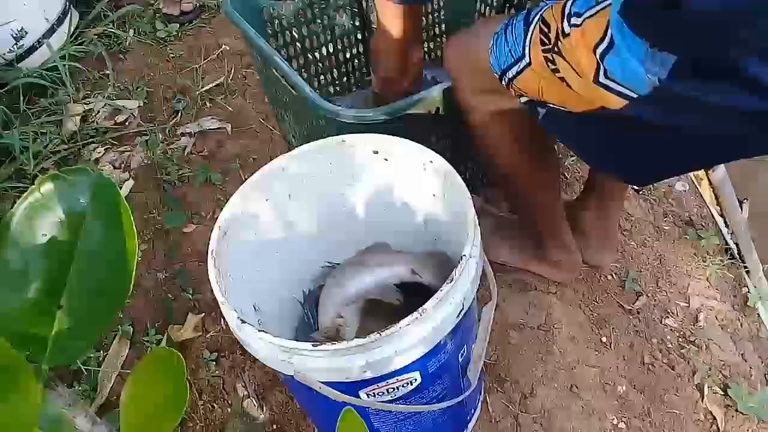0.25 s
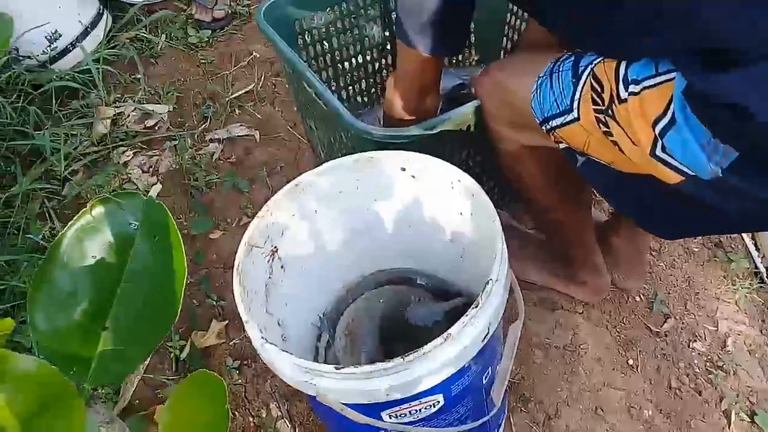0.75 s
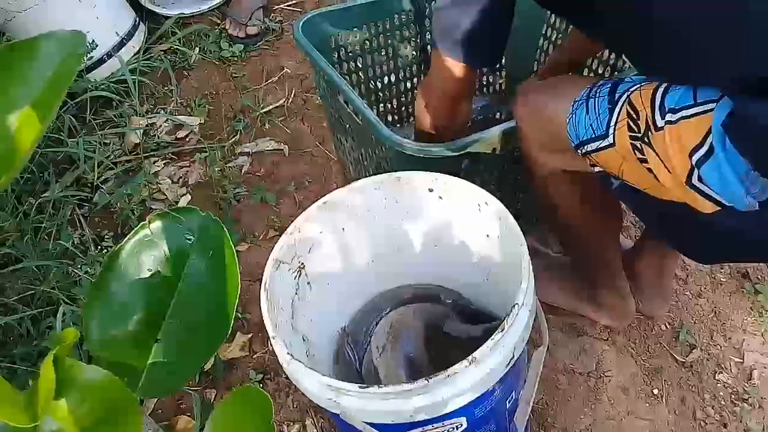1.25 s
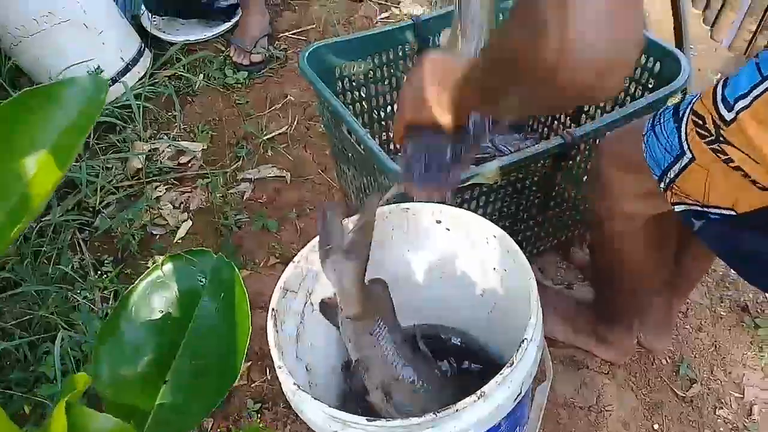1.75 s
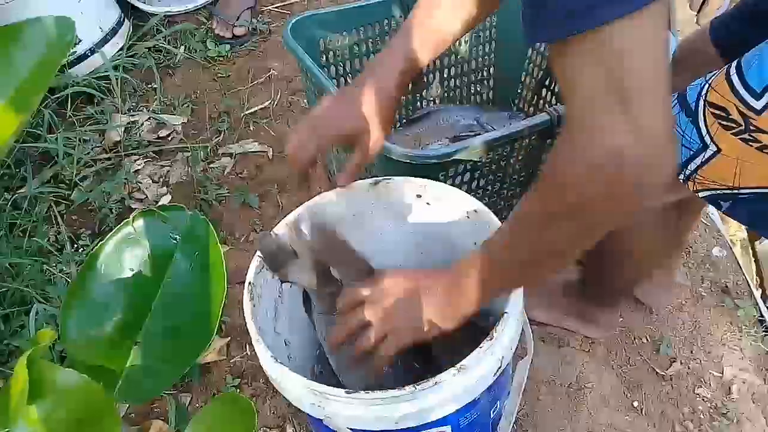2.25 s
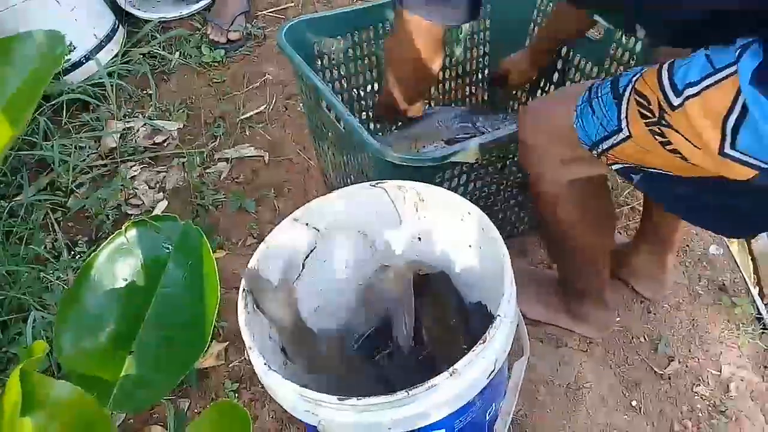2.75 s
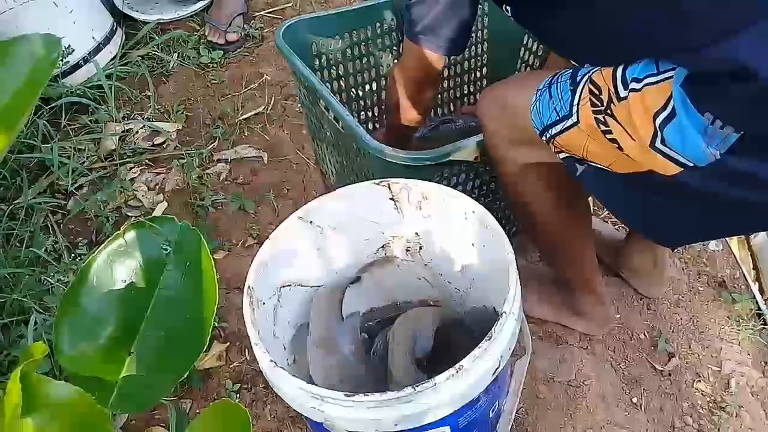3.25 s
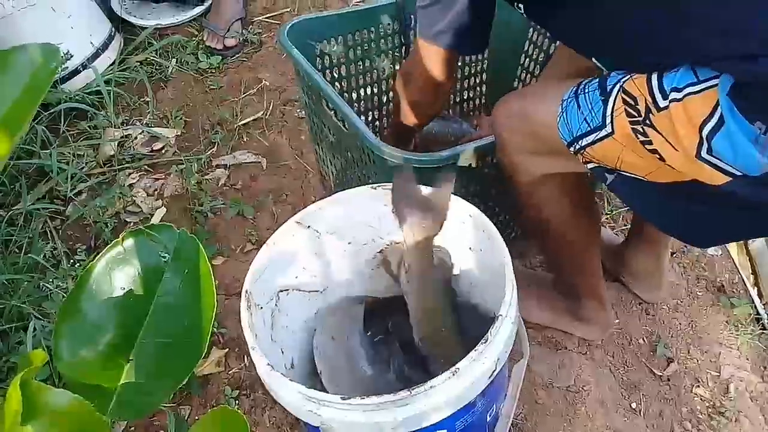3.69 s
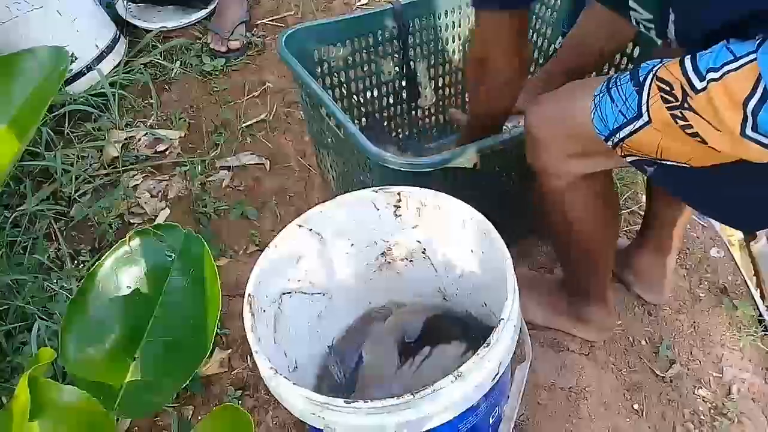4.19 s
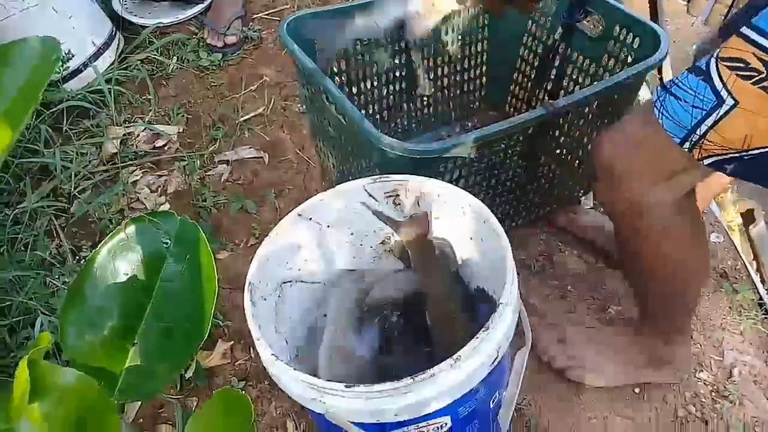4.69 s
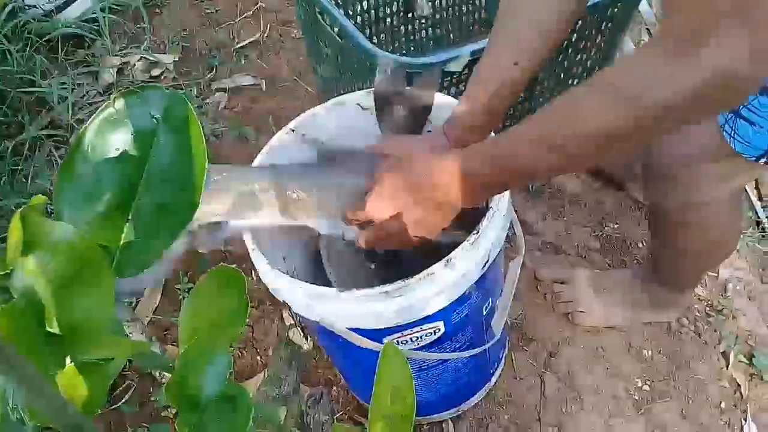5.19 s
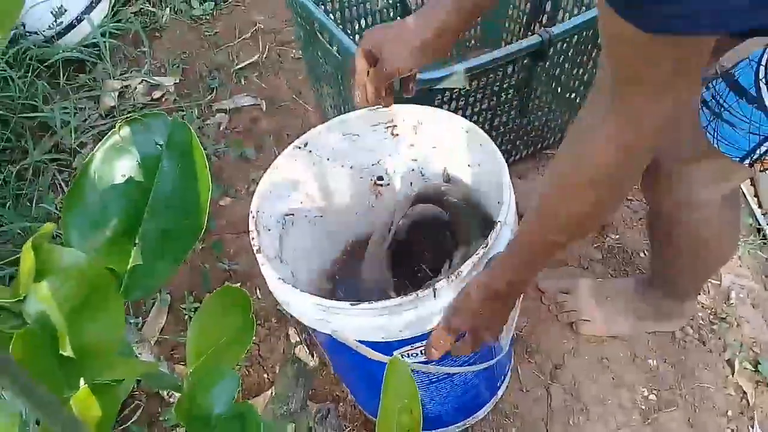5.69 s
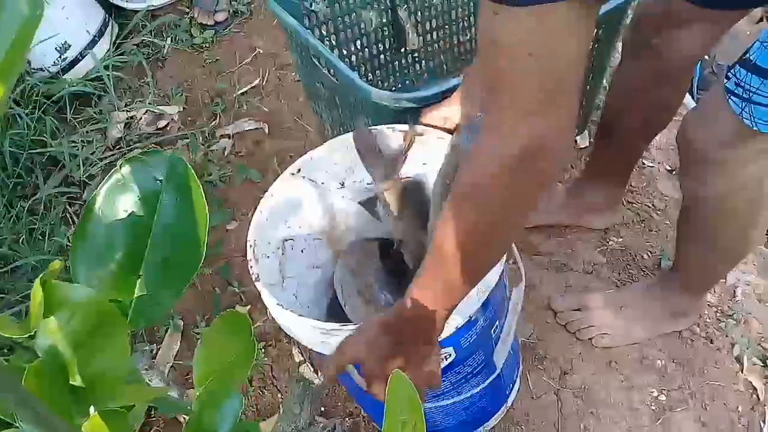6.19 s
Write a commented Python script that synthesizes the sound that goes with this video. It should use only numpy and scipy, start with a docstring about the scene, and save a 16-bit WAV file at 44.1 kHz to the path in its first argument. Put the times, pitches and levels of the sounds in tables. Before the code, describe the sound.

Wet slaps, slimy squelches and dull hollow knocks of fish flopping in a plastic pail, with popping bubbles, dripping spray and very soft far insects.

```python
"""A soft garden hush with far insects is heard first, under the squelch of live fish in a plastic bucket.
The fish wriggle over one another, sounding by friction and by many small bubbles; larger air pockets pop.
In fits they thrash: wet tails slap with impulsive noise bursts, and thrown spray patters back.
Heavy bodies make the bucket's air column resonate, and fish dropped in land on the bottom with dull thuds.
"""
import sys
import numpy as np
from scipy import signal
from scipy.fft import rfft, irfft
from scipy.io import wavfile

SR = 44100
rng = np.random.default_rng(int(sys.argv[2]) if len(sys.argv) > 2 else 0)


def master(y):
    """Save y as 16-bit WAV."""
    cut = np.clip(np.atleast_2d(y).T, -1, 1)
    pcm = np.round(cut * 32767)  # scale
    wavfile.write(sys.argv[1], SR, pcm.astype(np.int16))


N = 283739

# Spectrum of the garden hush, before scaling to unit rms: f/Hz, relative level/dB
HUSH_SPECTRUM = [(18, -45), (30, -11.5), (97, 2.5), (197, -8), (332, -3.5), (546, -16), (2420, 1.5),
                 (6540, -11.5), (7650, -11.5), (8280, -17), (10200, -10.5), (13600, -33.5), (15500, -32)]
# Resonant notes of far insects: f/Hz, half-amplitude width/Hz, level before the swell/dB
INSECT_NOTES = [(3380, 25, -62), (7570, 530, -59.5), (13561, 100, -68.5)]
# Swell of the insect chorus: t/s, relative level/dB
CHORUS_SWELL = [(0, 0), (1.8, 0), (4.9, 2.5), (6.2, -5.5)]
# Fish wriggling over others: t of greatest motion/s, half length/s, squelch level/dB, wall-rub level/dB
WRIGGLES = [(0.197, 0.037, -45, -53.5), (0.356, 0.096, -48, -56), (0.557, 0.023, -45, -41),
            (0.806, 0.065, -43, -50), (0.992, 0.032, -45.5, -63), (1.234, 0.056, -42, -44.5),
            (1.61, 0.051, -52.5, -59), (2.235, 0.025, -48, -49.5), (2.477, 0.091, -51, -47),
            (3.107, 0.017, -36, -46), (3.43, 0.17, -53, -56.5), (4.294, 0.15, -51, -54.5),
            (4.75, 0.075, -44, -66), (4.96, 0.13, -54, -54.5), (5.308, 0.063, -39.5, -37),
            (5.5, 0.15, -42, -41), (6, 0.091, -51, -52), (6.245, 0.093, -43.5, -43),
            (6.428, 0.065, -47, -51.5)]
# Spectral weight of squelching bubbles: f/Hz, relative level/dB
SQUELCH_SPECTRUM = [(400, -8), (1400, 2.5), (4500, -3.5), (6500, -15.5), (10500, -12), (15500, -26)]
# Popping air pockets: t/s, level/dB, f/Hz
AIR_POCKETS = [(0.26, -28.5, 1620), (0.384, -30, 1860), (0.399, -26, 1050), (1.666, -29, 2320),
               (2.734, -28, 1154), (3.127, -14, 4800), (3.27, -26, 1204), (3.503, -32, 1430),
               (3.813, -15, 915), (5.241, -20, 853), (5.29, -22, 893), (5.397, -36, 720),
               (5.414, -28, 1760), (5.674, -25, 1760)]
# Modes of the bucket's cavity and wall: f/Hz, level relative to the ring setting/dB, 60 dB decay time/s
BUCKET_MODES = [(840, -18, 0.018), (1010, -23, 0.019), (1020, -25, 0.018), (1350, -11, 0.058),
                (1427, 4, 0.036), (1516, -0.5, 0.075), (1860, -4.5, 0.12), (4370, 1, 0.03)]
# Spectrum of wet impacts: f/Hz, relative level/dB
WET_SPECTRUM = [(200, 3), (450, -1.5), (900, 0), (2800, 5.5), (4600, 4), (6200, 1.5), (10500, 1.5),
                (13000, -3.5), (15500, -15)]
# Slaps of a tail or flank: t/s, smack level/dB, f of the hollow under it/Hz,
# body level/dB, spray level/dB, decay time/s
SLAPS = [(0.5069, -23, 1540, -19, -27, 0.0024), (0.5715, -34.5, 2480, -46, -45, 0.0034),
         (0.723, -42.5, 4500, -46, -46, 0.0044), (0.778, -37.5, 1650, -43, -38, 0.013),
         (1.0287, -39.5, 4760, -42, -46, 0.0059), (1.2222, -30, 4640, -64, -36.5, 0.008),
         (1.276, -37.5, 1370, -53, -38.5, 0.0052), (1.3368, -34, 2700, -36.5, -41, 0.0051),
         (2.382, -33.5, 1440, -44, -35, 0.0044), (2.7203, -37.5, 1510, -28, -50, 0.012),
         (3.0193, -24.5, 2750, -24, -23, 0.0086), (3.0451, -29.5, 4230, -38, -28.5, 0.017),
         (3.0589, -29.5, 2110, -27, -36, 0.0036), (3.1254, -35, 4740, -38, -39, 0.0059),
         (3.169, -40.5, 4150, -54, -42, 0.0032), (3.768, -23, 1735, -21.5, -25, 0.017),
         (3.819, -21, 1560, -19.5, -22, 0.0083), (3.853, -32.5, 2660, -45, -30, 0.0076),
         (4.4988, -29, 4350, -31, -25, 0.0027), (4.5128, -27, 1460, -24, -40, 0.0041),
         (4.5263, -20.5, 1440, -42, -24.5, 0.016), (4.563, -26.5, 4080, -23.5, -33.5, 0.0025),
         (4.6028, -34.5, 2270, -53, -45, .005), (4.6505, -35.5, 2930, -35.5, -45, 0.011),
         (4.733, -32.5, 1990, -42, -38, 0.0056), (5.241, -33.5, 1650, -24, -42, 0.011),
         (5.2544, -26.5, 2080, -30, -22.5, 0.0094), (5.2887, -27.5, 1550, -27, -38, 0.021),
         (5.337, -29.5, 2000, -29.5, -37.5, 0.021), (5.4212, -33, 1740, -33, -36, 0.0059),
         (5.7269, -27, 2070, -21.5, -33, 0.0052), (6.197, -23.5, 3980, -21.5, -22.5, 0.0097),
         (6.2254, -28.5, 1510, -29, -31, 0.005)]
# Whole fish landing on the bottom: t one thud time after the height/s, level/dB
LANDINGS = [(0.519, -19), (3.059, -31), (3.818, -21), (4.526, -44), (5.33, -31), (5.729, -33.5)]
# Bodies bumping the wall so that the air booms: t/s, level/dB, f/Hz
BOOMS = [(0.516, -17, 266.5), (1.025, -32.5, 275), (1.091, -32.5, 265), (1.163, -31, 288),
         (1.338, -28.5, 278), (1.577, -33, 288), (2.265, -36.5, 253), (2.482, -32, 298), (2.724, -41, 275),
         (3.059, -29.5, 257), (3.432, -29, 297), (3.773, -26.5, 334), (3.817, -17.5, 291),
         (4.529, -23.5, 290), (5.247, -16.5, 279), (5.305, -18.5, 265), (5.329, -19, 264),
         (5.541, -27, 300), (5.73, -18.5, 299), (6.222, -23.5, 297)]

TIME, FREQS = np.arange(N) / SR, np.fft.rfftfreq(N, 1 / SR)
HUSH_DB, WAVER_DB = -49.5, 0.7  # level of the hush and size of its wavering
RESTLESS_DB = -53.5  # the squelch that never stops
FALLBACK_DB, FALLBACK_RUB_DB, SETTLE_S = -8.5, -19, 0.073  # returning water, relative to each slap's spray
STICK_DB, STICKS_PER_S = 2.5, 55  # slimy skin sticks and slips
DRIPS_PER_S, DRIP_DB, DRIP_SPREAD_DB = 45, -6.5, 7  # drop level is relative to the squelch
POCKET_CYCLES = 7  # cycles in one decay time of a pocket or drip bubble
FIRM_DB, SLAP_RISE_S, SOFTNESS = -25, 0.00029, 0.36  # the rise holds at FIRM_DB; weaker blows rise more slowly
NUDGE_DB, NUDGE_HZ, NUDGE_S = -5, 317, 0.0091  # wall flexing; level is relative to each slap's body
EDGE_HZ = 15900


def gain_of(db):
    """Amplitude ratio: 20 dB is a factor of ten."""
    return 10 ** (np.asarray(db) / 20)


def evened(x):
    """Normalization to unit rms."""
    return x / np.sqrt(np.mean(x ** 2) + 1e-20)


def read(points, hz):
    """Interpolation: a spectrum table joined in dB along log frequency, returned as gain."""
    f, db = np.transpose(points)
    return gain_of(np.interp(np.log(hz + 1), np.log(f + 1), db))


def add(mix, s, sound):
    """Superposition: adds a sound to the mix at time s."""
    part = mix[max(round(s * SR), 0):][:len(sound)]
    part += sound[:len(part)]


def band(x, lo_hz, hi_hz, order=3):
    """Causal band-pass filtering."""
    edges = [lo_hz, min(hi_hz, SR / 2 - 100)]
    return signal.sosfilt(signal.butter(order, edges, "band", fs=SR, output="sos"), x)


def colour(x, points, size=512):
    """Minimum-phase filtering: a causal response with the given spectrum keeps attacks sharp."""
    log_gain = np.log(read(points, abs(np.fft.fftfreq(size, 1 / SR))))
    # The Hilbert transform of the log gain gives the phase.
    response = np.exp(np.conj(signal.hilbert(log_gain)))
    taps = np.fft.ifft(response).real
    return signal.fftconvolve(x, taps)[:len(x)]


def drift(per_s):
    """Random modulation: straight lines join normally distributed knots."""
    knots = rng.standard_normal(N // 100)
    return np.interp(TIME * per_s, np.arange(len(knots)), knots)


def ringing_noise(hz, width_hz):
    """Resonance: noise is concentrated around one frequency."""
    resonance = 1 / (1 + ((FREQS - hz) / (width_hz / 2)) ** 2)
    return evened(irfft(rfft(rng.standard_normal(N)) * resonance, N))


def bubble(hz, decay, rise=0.03):
    """Damped bubble oscillation: trapped air rings briefly, its pitch rising as it opens."""
    t = np.arange(0, 7 * decay, 1 / SR)
    phase = 2 * np.pi * hz * t * (1 + rise * (t / decay / 2 - 1))
    return np.sin(phase) * np.exp(-t / decay) * (1 - np.exp(-t * hz))


def blow(x, window_s=0.0094):
    """Energy normalization: a burst gets the energy of a unit-rms sound as long as the window."""
    return x / np.sqrt(np.sum(x ** 2) / (window_s * SR) + 1e-20)


def bucket_response(ring_db=-42, echo_db=-2, echo_s=0.0063, yard_db=-21, yard_s=0.033, size=10000):
    """Impulse response: direct sound, wall echoes, the bucket's modes and a faint tail from the yard."""
    t = np.arange(size) / SR
    walls, yard = rng.standard_normal((2, size)) * (t > 0.0006)  # reflections follow the direct sound
    walls = walls * np.exp(-t / echo_s)
    yard = band(yard, 210, 8500, order=1) * np.exp(-t / yard_s)
    modes = sum(gain_of(db - 60 * t / t60) * np.cos(2 * np.pi * hz * t) for hz, db, t60 in BUCKET_MODES)
    echoes = gain_of(echo_db) * walls / np.linalg.norm(walls)
    echoes = echoes + gain_of(yard_db) * yard / np.linalg.norm(yard)
    return (t == 0) + gain_of(ring_db) * modes + echoes


def garden():
    """Shaped and narrow-band noise: a gently wavering hush with insect notes that swell and fade."""
    hush = evened(irfft(rfft(rng.standard_normal(N)) * read(HUSH_SPECTRUM, FREQS), N))
    hush = hush * gain_of(HUSH_DB + WAVER_DB * drift(14))
    insects = sum(ringing_noise(hz, width) * gain_of(db) for hz, width, db in INSECT_NOTES)
    return hush + insects * gain_of(np.interp(TIME, *np.transpose(CHORUS_SWELL)))


def stirring(flight_s=0.012):
    """Addition of powers: wriggles and falling spray set how strongly skins squelch and rub."""
    squelch, rub, fallback = np.zeros((3, N))
    t = np.arange(SR) / SR
    for s, _, _, _, spray, _ in SLAPS:
        falling = (1 - np.exp(-t / flight_s)) * np.exp(-t / SETTLE_S)
        add(fallback, s, (gain_of(spray) * falling) ** 2)
    for s, half_length, squelch_db, rub_db in WRIGGLES:
        swell = np.exp(-np.minimum(2 * ((TIME - s) / half_length) ** 2, 50))
        squelch += gain_of(squelch_db) ** 2 * swell
        rub += gain_of(rub_db) ** 2 * swell
    squelch = squelch + gain_of(FALLBACK_DB) ** 2 * fallback + gain_of(RESTLESS_DB) ** 2
    rub = rub + gain_of(FALLBACK_RUB_DB) ** 2 * fallback
    return np.sqrt(squelch), np.sqrt(rub)


def grains(per_s, cycles, spread_db, count=40):
    """Random bubble births: tiny damped oscillators of many pitches ring for a few cycles each."""
    out = np.zeros(N)
    births = np.flatnonzero(rng.random(N) < per_s / SR)
    pitches = np.geomspace(450, 14000, count)
    shapes = [read(SQUELCH_SPECTRUM, hz) * hz * bubble(hz, cycles / hz) for hz in pitches]
    kinds = rng.integers(0, count, N)
    sizes = gain_of(spread_db * np.minimum(rng.exponential(1, N), 3))
    for i in births:
        add(out, i / SR, sizes[i] * shapes[kinds[i]])
    return out


def slither(bucket, bubbles_db=-3, slosh_db=-8):
    """Stick-slip friction: skins crackle and bubble; rubbing excites the air column and sloshing water."""
    squelch, rub = stirring()
    film = signal.oaconvolve(grains(per_s=1800, cycles=2.15, spread_db=3.5), bucket)[:N]
    froth = grains(per_s=600, cycles=6, spread_db=3)
    wet = evened(evened(film) + gain_of(bubbles_db) * evened(froth))
    murmur = evened(ringing_noise(298.6, 114) + gain_of(slosh_db) * ringing_noise(566, 250))
    stick_slip = evened(gain_of(STICK_DB * drift(STICKS_PER_S)))
    return (wet * squelch + murmur * rub) * stick_slip


def drips(bucket, tick_db=-3):
    """Impulse and bubble radiation: drops tick on the wall and leave bubbles, louder when water is stirred."""
    squelch, _ = stirring()
    ticks, plinks = np.zeros((2, N))
    pitches = np.geomspace(900, 5000, 50)
    for place, size, pitch in rng.random((int(DRIPS_PER_S * N / SR), 3)):
        s = place * N / SR
        level = gain_of(DRIP_SPREAD_DB * min(-np.log(size), 3))
        hz = pitches[int(pitch * 50)]
        add(ticks, s, np.array([level]))
        add(plinks, s, level * bubble(hz, POCKET_CYCLES / hz))
    ticks = colour(signal.oaconvolve(ticks, bucket)[:N], WET_SPECTRUM)
    drops = evened(evened(plinks) + gain_of(tick_db) * evened(ticks))
    return gain_of(DRIP_DB) * squelch * drops


def pockets(burst_db=-13, burst_s=0.0038):
    """Bubble resonance: air pockets pop with a tiny spatter, the small, high ones dying sooner."""
    out = np.zeros(N)
    for s, db, hz in AIR_POCKETS:
        spatter = evened(band(rng.standard_normal(SR // 10), hz / 2, hz * 2, order=1))
        add(out, s, gain_of(db) * bubble(hz, POCKET_CYCLES / hz))
        add(out, s, gain_of(db + burst_db) * spatter * np.exp(-TIME[:len(spatter)] / burst_s))
    return out


def swishes(swish_db=-12, lead=1.6, shove_db=-17, shove_s=0.0036, size=2000):
    """Flow noise: a tail cuts and shoves the water with a hiss that grows until the slap."""
    out, before = np.zeros(N), np.arange(size)[::-1] / SR
    for s, _, _, body, spray, decay in SLAPS:
        rush = evened(band(rng.standard_normal(size), 600, 4300, order=1))
        rush = rush * np.exp(-before / (lead * decay))
        shove = evened(band(rng.standard_normal(size), 420, 2200, order=2)) * np.exp(-before / shove_s)
        add(out, s - before[0], gain_of(spray + swish_db) * rush + gain_of(body + shove_db) * shove)
    return out


def landings(thud_s=0.0072, soil_db=-16):
    """Damped impact: the bottom thuds under a falling fish and the soil below shakes a little."""
    out, t = np.zeros(N), np.arange(SR // 5) / SR
    for s, db in LANDINGS:
        bottom, soil = rng.standard_normal((2, len(t)))
        bottom = evened(band(bottom, 106, 220, order=2))
        soil = evened(band(soil, 30, 82, order=1))
        envelope = (t / thud_s) * np.exp(-t / thud_s)
        add(out, s - 2 * thud_s, gain_of(db) * (bottom + gain_of(soil_db) * soil) * envelope)
    return out


def droplets(hz, scatter_s=0.013, spread=0.335, cycles=5, size=8000, count=14):
    """Bubble entrainment: one slap stirs in bubbles pitched around its hollow, weaker the later they come."""
    out = np.zeros(size)
    delays = rng.exponential(1, count)
    pitches = hz * np.exp(spread * rng.uniform(-1.75, 1, count))
    for late, pitch in zip(delays, pitches):
        add(out, late * scatter_s, np.exp(-late / 2) * bubble(pitch, cycles / pitch))
    return out


def slaps(splatter_db=-22, splatter_s=0.022, grain_db=5.5, hollow_width=1.374, drops_db=-5, size=8000):
    """Impulsive excitation: a torn water film snaps and rings its hollow; splatter and bubbles follow."""
    out, t = np.zeros(N), np.arange(size) / SR
    for s, smack, hz, body, spray, decay in SLAPS:
        rise = SLAP_RISE_S * gain_of(SOFTNESS * (FIRM_DB - smack))
        # the noise level jumps every 20 samples, giving separate snaps
        roughness = np.repeat(np.clip(rng.standard_normal(size // 20), -2, 2), 20)
        snaps = rng.standard_normal(size) * gain_of(grain_db * roughness)
        fading = np.exp(-t / decay) + gain_of(splatter_db) * np.exp(-t / splatter_s)
        force = (1 - np.exp(-t / rise)) * fading
        # each slap lands elsewhere in the bucket, so it has its own echoes
        echoed = signal.fftconvolve(snaps * force, bucket_response())[:size]
        burst = colour(echoed, WET_SPECTRUM)
        low = blow(band(burst, 620, 1500, order=2))
        middle = blow(band(burst, 1700, 5000, order=2))
        high = blow(band(burst, 6000, 16000, order=2))
        hollow = blow(band(burst, hz / hollow_width, hz * hollow_width, order=2))
        drops = gain_of(drops_db) * blow(droplets(hz))
        add(out, s, gain_of(smack) * (middle + hollow + drops) + gain_of(body) * low + gain_of(spray) * high)
    return out


def flexes(attack_s=0.0023, scatter=0.13):
    """Damped wall vibration: each slap rings the wall low and briefly, the place of impact varying its pitch."""
    out, t = np.zeros(N), np.arange(SR // 8) / SR
    places = rng.uniform(-1.26, 1, len(SLAPS))
    envelope = (1 - np.exp(-t / attack_s)) * np.exp(-t / NUDGE_S)
    for (s, _, _, body, _, _), place in zip(SLAPS, places):
        ring = np.sin(2 * np.pi * NUDGE_HZ * (1 + scatter * place) * t)
        add(out, s, gain_of(body + NUDGE_DB) * ring * envelope)
    return out


def booms(attack_s=0.0013, decay_s=0.013, knock_db=-13, knock_s=0.0097):
    """Quarter-wave resonance: a bump rings the air column while the soft wall knocks."""
    out, t = np.zeros(N), np.arange(SR // 5) / SR
    for s, db, hz in BOOMS:
        air = np.sin(2 * np.pi * hz * t) * np.exp(-t / decay_s)
        wall = evened(band(rng.standard_normal(len(t)), 605, 840, order=2)) * np.exp(-t / knock_s)
        attack = 1 - np.exp(-t / attack_s)
        add(out, s - attack_s, attack * gain_of(db) * (air + gain_of(knock_db) * wall))
    return out


def scene():
    """Superposition of the garden and all the sounds of the fish, in one channel."""
    bucket = bucket_response()
    restless = slither(bucket) + drips(bucket) + pockets()
    blows = swishes() + landings() + slaps() + flexes() + booms()
    return (garden() + restless + blows)[None]


def record(dry):
    """Band limitation: a small microphone loses deep bass, then the recorder removes the highest treble."""
    thin = signal.sosfilt(signal.butter(2, 50, "high", fs=SR, output="sos"), dry)
    low_pass = signal.firwin(511, EDGE_HZ, window=("kaiser", 9), fs=SR)
    return signal.oaconvolve(thin, low_pass[None], "same")


dry = scene()
out = record(dry)
master(out)
```